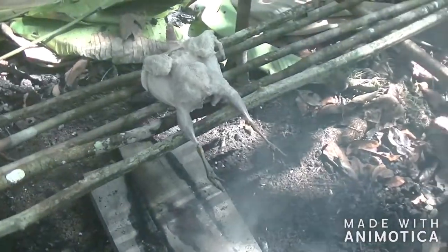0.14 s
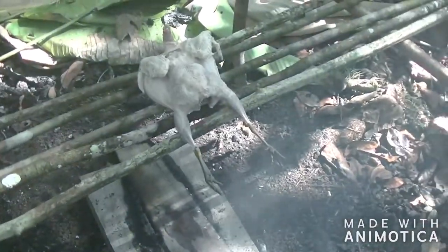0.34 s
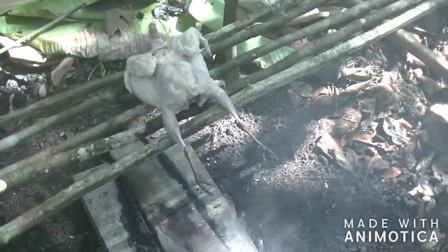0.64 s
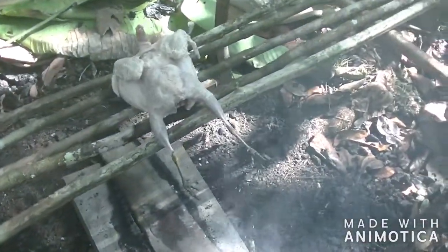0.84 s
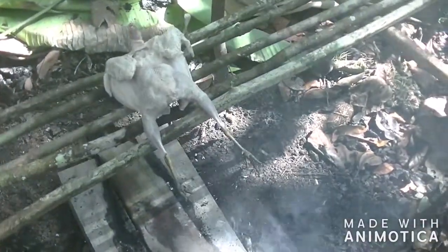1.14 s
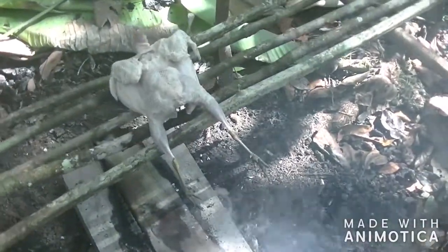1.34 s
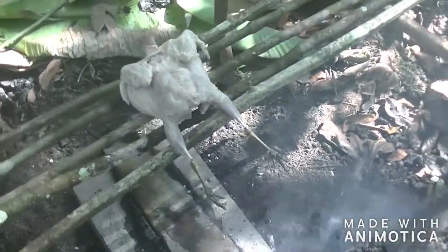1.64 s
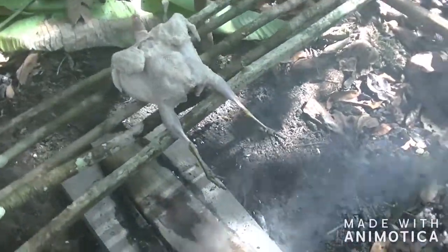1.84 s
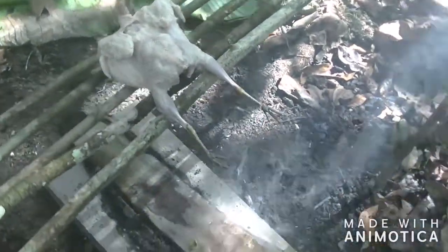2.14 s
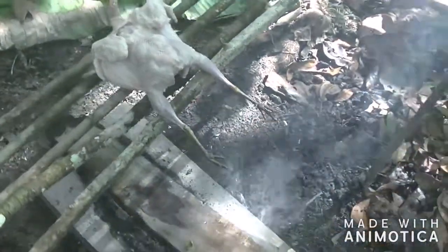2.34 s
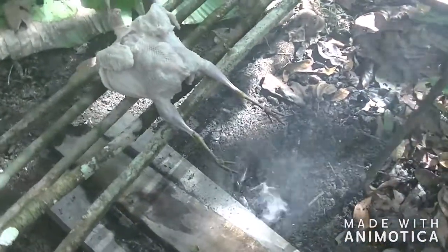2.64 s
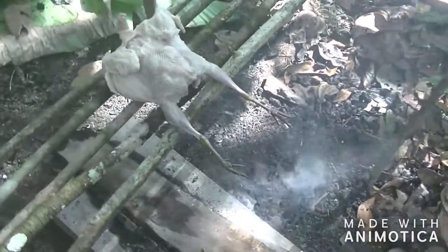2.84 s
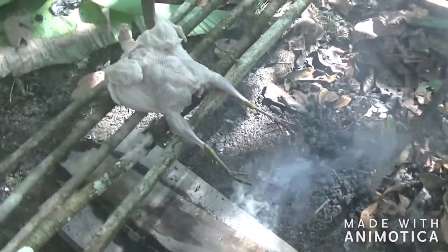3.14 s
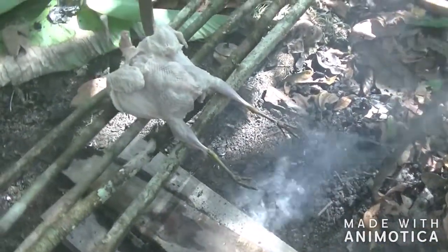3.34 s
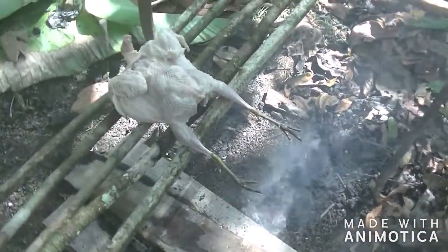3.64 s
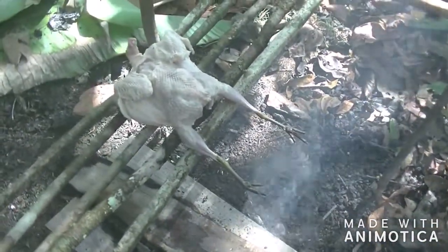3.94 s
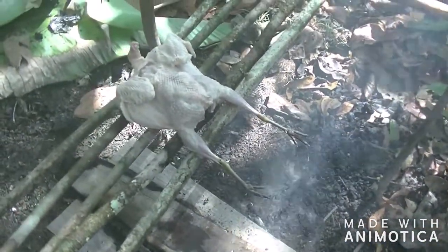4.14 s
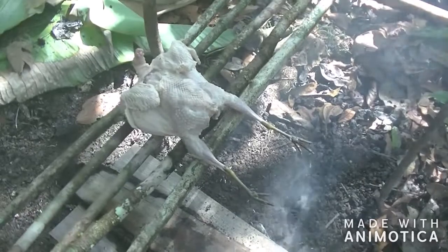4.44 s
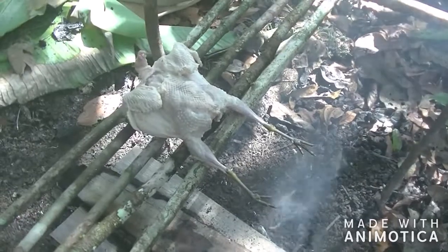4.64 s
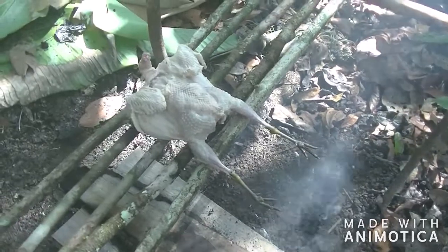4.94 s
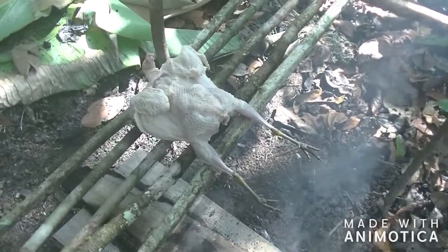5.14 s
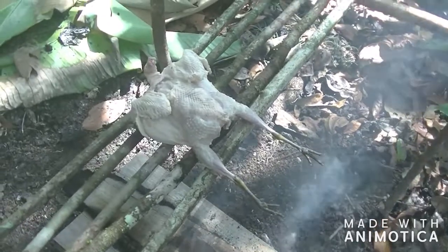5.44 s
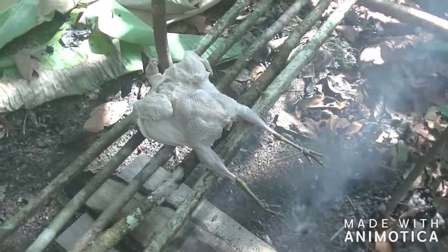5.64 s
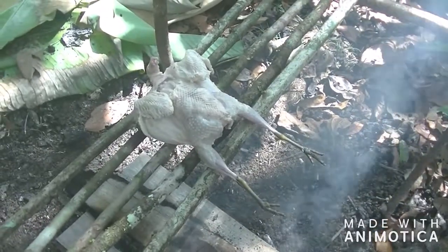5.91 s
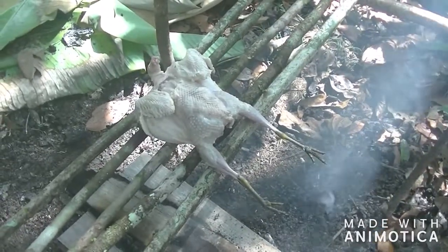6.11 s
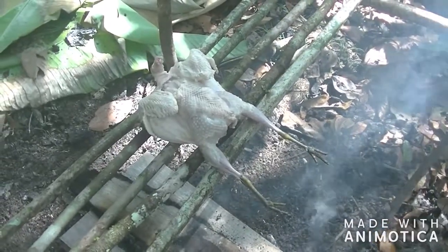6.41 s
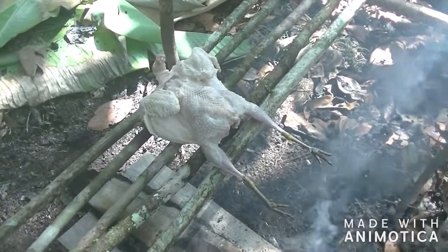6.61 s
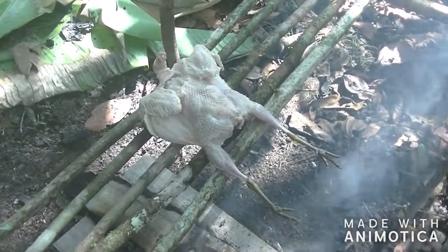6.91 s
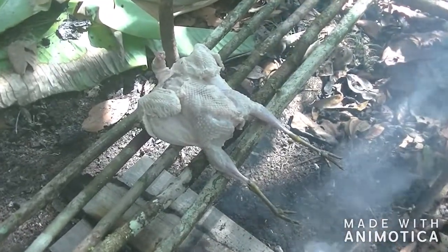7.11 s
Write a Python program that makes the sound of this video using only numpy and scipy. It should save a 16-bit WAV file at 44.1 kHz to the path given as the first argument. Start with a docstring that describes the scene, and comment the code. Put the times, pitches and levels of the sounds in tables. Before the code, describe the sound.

Soft ember ticks and sizzles over a steady insect drone, then sharp, dry wood-fire pops crack close by in a forest.

```python
"""Embers tick and sizzle softly in a wood fire in a forest; from about halfway come sharp, dry pops close by.
Each pop is one click into the same set of short resonances; a few also set a stick knocking.
Ticks are short decaying tones; sizzling, crumbling and scuffing are clumps of filtered noise grains.
Insects trill with falling chirps and hiss, others buzz, and a cicada swells into a steady drone of narrow noise.
A few faint hoots, nearly pure tones, come from far away over a soft rush of coloured noise."""
import sys
import numpy as np
from scipy import signal
from scipy.fft import rfft, irfft, next_fast_len
from scipy.io import wavfile

SR = 44100
rng = np.random.default_rng(int(sys.argv[2]) if len(sys.argv) > 2 else 0)


def digitize_waveform(pressure):
    """Quantize a signal to 16-bit integers and store it at the path in sys.argv[1].

    Rows of a 2-D input are taken as channels; values are limited to [-1, 1].
    """
    field = np.atleast_2d(pressure).T
    bounded = np.clip(field, -1, 1)
    quanta = np.round(bounded * 32767).astype(np.int16)
    wavfile.write(sys.argv[1], SR, quanta)


N = 320607  # length in samples
T = np.arange(N) / SR  # time in seconds
HZ = np.fft.rfftfreq(N, 1 / SR)


def amp(db):
    """Turns decibels into a gain."""
    return 10 ** (np.asarray(db) / 20)


def unit(x):
    """Scales a signal to an rms (average strength) of 1."""
    return x / np.sqrt(np.mean(abs(x) ** 2) + 1e-30)


def read(points, hz):
    """Reads a table of values against frequency, joining its points on a log-frequency axis."""
    f, value = np.transpose(points)
    return np.interp(np.log(hz + 1), np.log(f + 1), value)


def panned(db):
    """Left and right gains for a left-right level difference."""
    difference = np.atleast_1d(db)
    return amp(np.array([difference, -difference]) / 2)


def add(mix, s, sound):
    """Mixes a stereo sound in at time s, cutting off whatever runs past the end."""
    part = mix[:, max(round(s * SR), 0):][:, :sound.shape[1]]
    part += sound[:, :part.shape[1]]


def resonances(modes, hz):
    """Gain of a set of steep resonances, each a peak at one pitch, added by power."""
    power = 0
    for f, width, db in modes:
        power = power + amp(db) ** 2 / (1 + (2 * (hz - f) / width) ** 2) ** 2
    return np.sqrt(power)


def two_eared(modes, hz):
    """Left and right gains of resonances that each radiate more to one side."""
    return np.sqrt(sum((resonances([mode], hz) * panned(pan_db)) ** 2 for *mode, pan_db in modes))


def struck(gain, travel_s=0.000393, at_hz=3500):
    """How a body with this gain answers one click; bending waves carry the low notes more slowly."""
    log_gain = np.log(np.maximum(gain, 1e-5))
    circle = np.concatenate([log_gain, log_gain[:, -2:0:-1]], axis=1)
    hz = np.fft.rfftfreq(circle.shape[1], 1 / SR)
    lag_turns = travel_s * (2 * np.sqrt(hz * at_hz) - hz * np.sqrt(at_hz / hz[-1]))
    # the Hilbert transform gives the phase that keeps sound from starting before the click
    log_response = np.conj(signal.hilbert(circle))[:, :len(hz)]
    return irfft(np.exp(log_response - 2j * np.pi * lag_turns))


def drift(rate_hz):
    """A random curve of rms 1; a lower rate makes it wander more slowly."""
    return unit(irfft(rfft(rng.standard_normal(N)) * np.exp(-(HZ / rate_hz) ** 2), N))


def noise(gain):
    """Coloured stereo noise of rms 1, partly alike in the two ears."""
    # How alike the ears are. Each row: frequency in Hz, likeness from -1 (opposite) to 1 (the same).
    likeness = [(60, -0.88), (200, -0.54), (450, -0.6), (750, -0.31), (1100, -0.059), (1700, 0.35),
                (2600, 0.78), (4500, 0.69), (8000, 0.98), (15000, 1)]
    # Which side is louder. Each row: frequency in Hz, left-right difference in dB.
    side_balance = [(100, 0.4), (400, -0.2), (700, -0.7), (1150, -1), (2100, -1), (3100, 1.5), (4500, -0.5),
                    (5900, .6), (8500, -.5), (15000, 0)]
    left, other = rng.standard_normal((2, len(HZ), 2)) @ [1, 1j]
    same = np.clip(read(likeness, HZ), -1, 1)
    right = same * left + np.sqrt(1 - same ** 2) * other
    spectrum = np.array([left, right]) * gain * panned(read(side_balance, HZ))
    size = next_fast_len(N)  # a length that transforms quickly
    spread = np.linspace(0, len(HZ) - 1, size // 2 + 1).astype(int)
    return unit(irfft(spectrum[:, spread], size)[:, :N])


def phrase(start, end, fade):
    """A level that fades in after start and out before end."""
    return np.sin(np.pi / 2 * np.clip(np.minimum(T - start, end - T) / fade, 0, 1))


def scatter(x, t60, wet_db, size):
    """Adds a spray of reflections, different at each ear, that falls 60 dB in t60 seconds."""
    t = np.arange(size) / SR
    tail = rng.standard_normal((2, size)) * amp(-60 * t / t60) * (t > .0005)
    tail /= np.linalg.norm(tail, axis=1, keepdims=True)
    return x + amp(wet_db) * signal.oaconvolve(x, tail, axes=1)[:, :N]


def air(level_db=-56, fall_db_per_s=0.1638, flicker_db=1.02):
    """Forest air and the fire's soft rush: slightly restless coloured noise that slowly eases."""
    # Colour of the rush. Each row: frequency in Hz, relative strength in dB per Hz.
    colour = [(25, -28), (55, -12), (110, -3.5), (190, 1), (290, 6), (520, 1.5), (1000, -2), (1700, -2.5),
              (2500, -5), (3600, -4), (4500, -7.5), (7000, -9), (10000, -14.5), (15500, -20)]
    level = amp(level_db - fall_db_per_s * T + flicker_db * drift(23))
    return level * noise(amp(read(colour, HZ)))


def hoots(waver=0.0033, flutter_db=2.2, faint_db=18, rise=0.35):
    """Nearly pure far tones that swell once and die away among the trees."""
    # The far calls. Each row: start in seconds, length in seconds, pitch in Hz, level in dB.
    calls = [(2.437, 1.67, 567.3, -66), (3, 0.85, 1128, -60), (4.236, 0.48, 647, -57),
             (6.99, 0.12, 1050, -63)]
    out = np.zeros((2, N))
    for start, length, hz, db in calls:
        # rise is the share of a hoot spent swelling; the ends are faint_db below the peak
        swell = np.interp((T - start) / length, [0, rise, 1], [-1, 0, 1])
        level = amp(db - faint_db * abs(swell) + flutter_db * drift(16))
        level = level * phrase(start, start + length, .02)
        turns = np.cumsum(hz * (1 + waver * drift(7.1))) / SR
        ear_phase = np.array([[.5], [-.5]])  # the left ear leads
        out += level * np.sqrt(2) * np.sin(2 * np.pi * turns + ear_phase)
    return out


def chorus(level_db=-59.5):
    """Steady far insects: noise in a few bands, its level drifting a little."""
    # The chorus bands. Each row: frequency in Hz, width in Hz, relative level in dB.
    bands = [(2894, 1000, -0.5), (5300, 750, -5.5), (5860, 840, -0.5), (7760, 310, -6.5), (8110, 150, -7)]
    return amp(level_db + drift(0.95)) * noise(resonances(bands, HZ))


def trill(start, end, hz, db, wingbeat_hz=62.4, width_hz=320, sag_hz=200, fade_s=0.14):
    """Each wing stroke is a short falling chirp; the trees blur distant singers into a hiss."""
    # Low singers pulse clearly, high ones are blurred. Each row: pitch in Hz, pulsing depth from 0 to 1.
    pulsing = [(5550, .9), (6150, 0.14)]
    clarity = np.clip(read(pulsing, hz), 0, 1)
    strokes = np.cumsum(wingbeat_hz * (1 + 0.0013 * drift(2.5))) / SR % 1
    pulses = unit(1 - clarity + clarity * np.sin(np.pi * strokes) ** 2)
    # the phrase sinks by sag_hz in all, and each stroke falls by width_hz
    sag = sag_hz * np.clip((T - start) / (end - start) - .5, -.5, .5)
    pitch = hz - sag + width_hz * (.5 - strokes + .18 * drift(60.5))
    chirp = np.sqrt(2) * np.sin(2 * np.pi * np.cumsum(pitch) / SR)
    hiss = noise(resonances([(hz, width_hz * 1.4, 0)], HZ))
    direct = .7 * clarity  # share of the power in the clear chirp
    voice = np.sqrt(direct) * chirp + np.sqrt(1 - direct) * hiss
    return amp(db) * phrase(start, end, fade_s) * pulses * voice


def trills():
    """Insects that each sing one pulsing phrase."""
    # The singers. Each row: start in seconds, end in seconds, pitch in Hz, level in dB.
    singers = [(1.027, 1.724, 5830, -62), (1.417, 1.982, 6250, -62.5), (1.878, 2.403, 5410, -61.5),
               (2.596, 3.204, 6080, -65.5), (3.221, 3.972, 5600, -61.5), (3.397, 4.012, 6170, -61.5),
               (4.356, 4.798, 5900, -71), (5.245, 5.718, 6190, -61.5), (5.62, 6.372, 5780, -59.5),
               (5.853, 6.483, 5410, -62.5), (6.721, 7.247, 6280, -62.5)]
    return sum(trill(*row) for row in singers)


def buzzing_insect(first_s=.22, every_s=1.665, length_s=1.33, level_db=-67):
    """A high buzz of narrow noise bands, repeating one phrase at an even pace."""
    # The buzz bands. Each row: frequency in Hz, width in Hz, relative level in dB.
    bands = [(7420, 120, -9), (7620, 180, -2), (8000, 76, -13)]
    starts = np.arange(first_s, T[-1], every_s)
    buzzing = sum(phrase(start, start + length_s, 0.087) for start in starts)
    return amp(level_db) * buzzing * noise(resonances(bands, HZ))


def cicada(level_db=-68.5, swell_db=14.5, swell_start_s=2.3, swell_s=3.76):
    """A drone of two narrow noise bands that starts soft, swells, and holds."""
    # The drone bands. Each row: frequency in Hz, width in Hz, relative level in dB.
    bands = [(3103, 52, -2.5), (3178.5, 39, 4.5)]
    drone_db = level_db + swell_db * np.clip((T - swell_start_s) / swell_s, 0, 1)
    return amp(drone_db) * noise(resonances(bands, HZ))


def insects():
    """All the insects: far chorus, trills, buzzing phrases and the cicada."""
    return chorus() + trills() + buzzing_insect() + cicada()


def clump(middle, length, db, bands, grain_db=5.0, grain_size=64, size=32768):
    """A short swell of uneven noise grains in the given bands: (start in seconds, sound)."""
    hz = np.fft.rfftfreq(size, 1 / SR)
    n = min(int(length * SR), size)
    grains = np.repeat(amp(grain_db * rng.standard_normal(size)), grain_size)[:size]
    # one noise shared by both ears, plus some of each ear's own
    drive = grains * (rng.standard_normal(size) + .5 * rng.standard_normal((2, size)))
    colour = 0
    for centre_hz, spread, band_db in bands:
        octaves = np.log2((hz + 1) / centre_hz)
        colour = colour + amp(band_db) * np.exp(-(octaves / spread) ** 2 / 2)
    grainy = unit(irfft(rfft(drive) * colour)[:, :n])
    return middle - length / 2, amp(db) * grainy * np.hanning(n)


def rustles(crumble_octaves=0.87):
    """Clumps of grains: high ones sizzle, middle ones crumble, low ones scuff."""
    # Levels in the three lists of clumps are those before each clump's rise and fall.
    # Sap sizzling. Each row: middle in seconds, length in seconds, level in dB.
    sizzles = [(.937, .25, -57), (1.534, 0.19, -56.5), (2.787, .012, -54), (3.09, 0.064, -63),
               (3.862, 0.061, -57)]
    # Bands of the sizzle. Each row: centre in Hz, spread in octaves, relative level in dB.
    sizzle_bands = [(7060, 0.39, -0.92), (13700, 0.099, -0.078)]
    # Dry crumbling, the loudest a spray of crumbs from the biggest pop.
    # Each row: middle in seconds, length in seconds, centre in Hz, level in dB.
    crumbles = [(0.104, 0.092, 1930, -53), (2.993, .022, 3300, -52), (4.195, .19, 3020, -46.5),
                (6.4, 0.031, 1500, -52.5)]
    # Soft low scuffs. Each row: middle in seconds, length in seconds, level in dB.
    scuffs = [(2.611, .038, -63.5), (3.836, 0.075, -50.5), (3.948, .06, -47.5), (4.199, 0.069, -50.5),
              (4.478, .06, -49.5), (4.932, .047, -60), (6.223, 0.036, -58)]
    # Band of the scuffs. Each row: centre in Hz, spread in octaves, relative level in dB.
    scuff_bands = [(190, 0.74, 0)]
    out = np.zeros((2, N))
    for row in sizzles:
        add(out, *clump(*row, sizzle_bands))
    for s, length, centre_hz, db in crumbles:
        add(out, *clump(s, length, db, [(centre_hz, crumble_octaves, 0)]))
    for row in scuffs:
        add(out, *clump(*row, scuff_bands))
    return out


def embers(per_s=70, spread_db=4, level_db=-69, fading_db=5, count=12):
    """Tiny ticks of random size, ringing for a cycle or two at one of several pitches; they slowly die down."""
    t = np.arange(256) / SR
    out = np.zeros((2, N))
    for hz in np.geomspace(1800, 14000, count):
        happens = rng.random(N) < per_s / count / SR
        sizes = amp(spread_db * np.minimum(rng.exponential(1, N), 2)) * happens
        tick = unit(np.sin(2 * np.pi * hz * t) * np.exp(-t * hz / 1.5))
        softer_when_high = amp(-1.2 * np.log2(hz / 1800))
        out += signal.oaconvolve(sizes, tick)[:N] * panned(rng.normal(0, 1)) * softer_when_high
    level = amp(level_db - fading_db * (T / T[-1] - .5))
    return level * unit(scatter(out, t60=0.027, wet_db=-7.5, size=2048))


def pops(main_hz=3500, lowest_hz=850, uneven_db=2, ripple_size=70, size=4096):
    """Each pop is one click into the same resonances: weak cracks are hollow, strong ones sharp."""
    # The pops. Each row: start in seconds, level in dB, edge (tilt above the main ring) in dB per octave,
    # level of the low thump in dB.
    cracks = [(0.0892, -31, -6, -25), (.896, -34, 13, -31), (2.086, -29.5, 0.5, -41),
              (2.3078, -42, 11.5, -38), (3.815, -20.5, -4, -21), (3.8158, -8.5, -10, -5),
              (3.838, -13.5, -3.5, -1), (3.9455, -31, 1, -12), (3.965, -24.5, -7, -26),
              (4.0455, -24.5, 2, -26), (4.1639, 8, -3.5, -10), (4.169, 3.5, -1, 0.5), (4.3075, 2, 0.5, 0.5),
              (4.45, 0.5, .5, -2.5), (4.4684, -1, -0.5, 3), (4.4942, -37, 8, -11), (4.703, 1, 0, -13),
              (4.816, 1.5, 0, -11), (4.8336, -3, -6, -14), (5.3202, -24, -32, -13.5),
              (5.4737, -35, 10.5, -36), (5.7637, 4, -3.5, -32), (5.7662, -4, -17, -11),
              (5.7925, -2, -3, -9), (5.8495, -14, -15, -2.5), (6.0618, -8.5, -7.5, -10),
              (6.3874, -31, -9, -17.5)]
    # What every pop rings with. Each row: frequency in Hz, width in Hz, relative level in dB,
    # left-right difference in dB.
    ring_modes = [(892, 89, -5, 3), (1140, 220, -14, 10), (1555, 178, 6, -5), (1787, 260, 2.5, 10.5),
                  (2315, 290, 4.5, 3), (2673, 183, 11, 0.5), (3200, 470, 14, 1.5), (3588, 420, 20.5, 2),
                  (3905, 136, 15, -7), (4190, 300, 11.5, -6.5), (4630, 190, 4, 17.5), (5070, 370, 10, -6),
                  (5490, 790, 6.5, 6), (7360, 610, 7, -5), (8110, 380, 4.5, 9), (8890, 940, 1, 2),
                  (9740, 420, -0.5, -0.5), (10960, 1200, -10, -4), (13500, 2400, -14, 2.5)]
    # The dull push under a pop. Each row: frequency in Hz, width in Hz, relative level in dB,
    # left-right difference in dB.
    thump_modes = [(192, 250, 2, -3.5), (336, 480, -3, 1)]
    # Sticks set knocking by a few cracks. Each row: start in seconds, frequency in Hz, width in Hz, level in dB.
    knocks = [(2.089, 2700, 300, -3), (3.8177, 2450, 450, 9.5), (3.838, 2280, 550, 8),
              (3.8387, 790, 610, -4.5), (5.8493, 1710, 1080, 5.5), (5.851, 869, 55, 4.5)]
    knock_pan_db = 4.5  # louder on the left
    # the weaker a pop, the more body below the main ring (dB per octave)
    body_at_full_db, body_per_db, body_most_db = -2, .95, 11

    hz = np.fft.rfftfreq(size, 1 / SR)
    out = np.zeros((2, N))
    octaves = np.log2(np.maximum(hz, lowest_hz) / main_hz)
    off_centre = np.minimum(abs(octaves), 1)  # the main ring stays put, the others vary
    ring = two_eared(ring_modes, hz) * hz ** 2 / (hz ** 2 + (lowest_hz / 2) ** 2)
    # the thump loses its deepest bass, below about 95 Hz
    thump = struck(two_eared(thump_modes, hz) * np.hypot(hz, 4) / np.hypot(hz, 95))
    for s, db, edge_db, thump_db in cracks:
        body_db = min(body_at_full_db - body_per_db * db, body_most_db)
        ripple = unit(np.convolve(rng.standard_normal(len(hz)), np.hanning(ripple_size), "same"))
        slope_db = np.where(octaves < 0, -body_db, edge_db) * octaves
        tilt = amp(db + slope_db + uneven_db * ripple * off_centre)
        add(out, s, struck(ring * tilt) + amp(thump_db) * thump)
    for s, *mode in knocks:
        add(out, s, struck(two_eared([(*mode, knock_pan_db)], hz)))
    return scatter(out, t60=0.016, wet_db=-12.0, size=2048)


def scene():
    """The forest all round, the fire in front."""
    return air() + hoots() + insects() + rustles() + embers() + pops()


def record(dry, edge_hz=16100):
    """Clips at full scale, then steeply removes everything above edge_hz."""
    lowpass = signal.firwin(255, edge_hz, window=("kaiser", 8), fs=SR)
    return signal.oaconvolve(np.clip(dry, -1, 1), lowpass[None], "same")


dry = scene()
out = record(dry)
digitize_waveform(out)
```